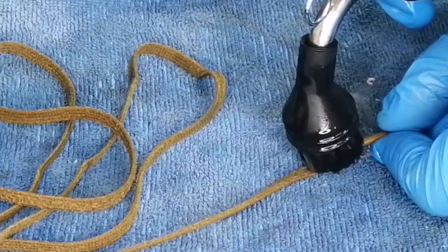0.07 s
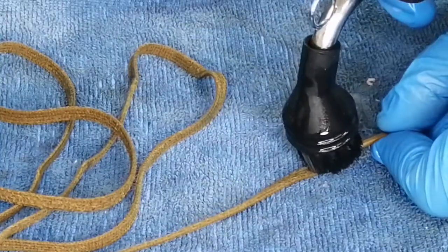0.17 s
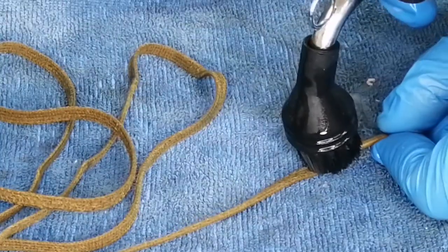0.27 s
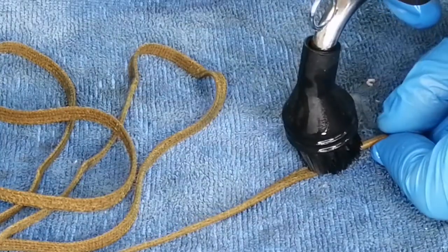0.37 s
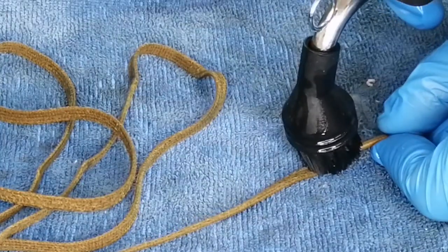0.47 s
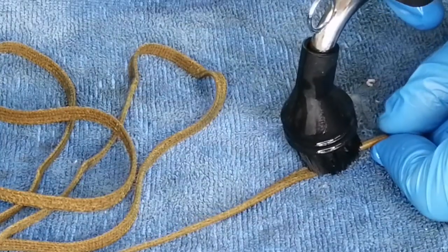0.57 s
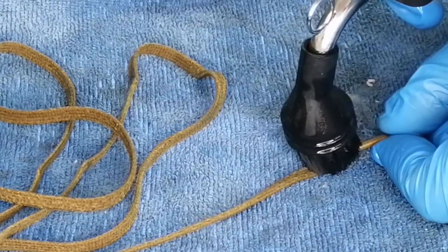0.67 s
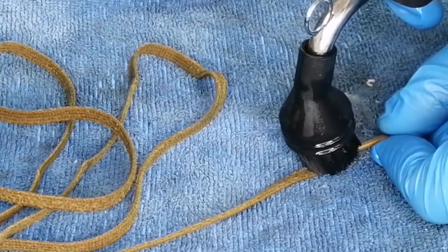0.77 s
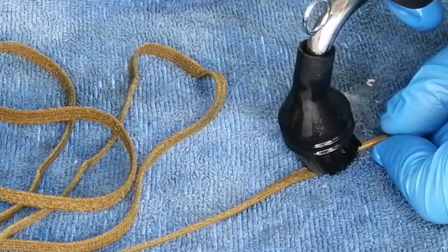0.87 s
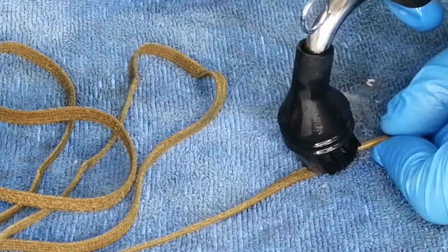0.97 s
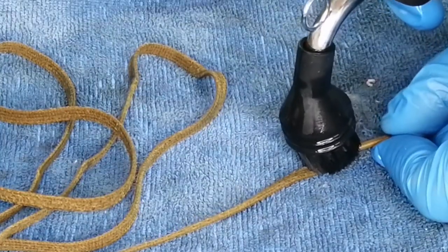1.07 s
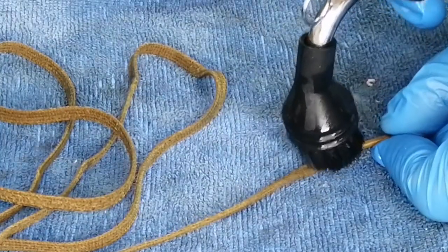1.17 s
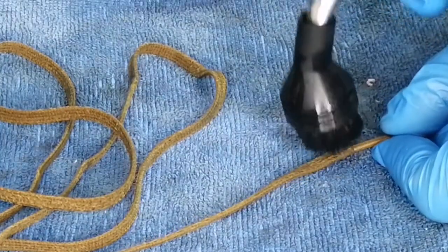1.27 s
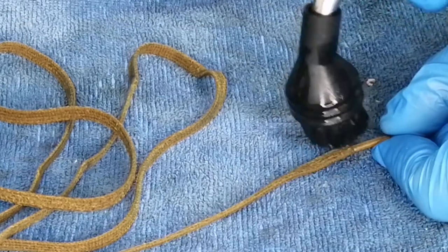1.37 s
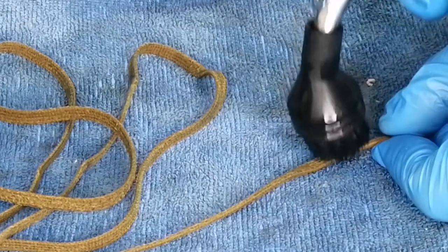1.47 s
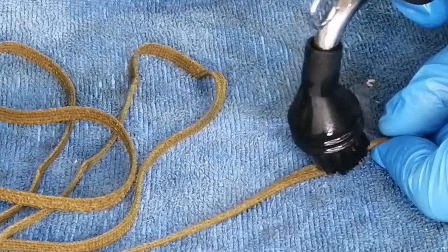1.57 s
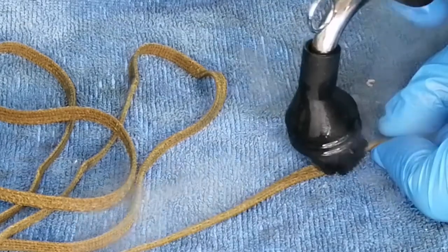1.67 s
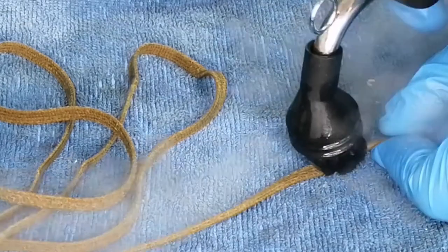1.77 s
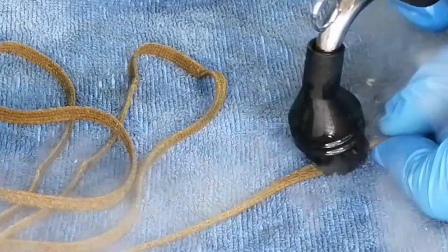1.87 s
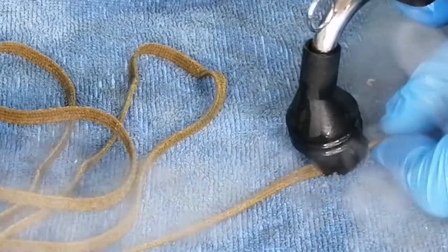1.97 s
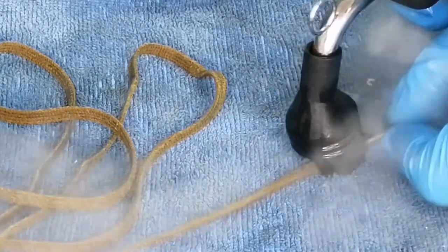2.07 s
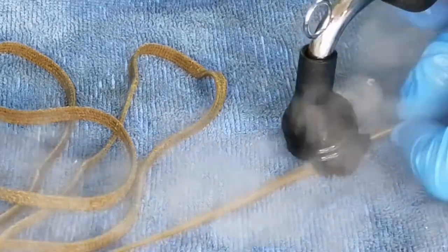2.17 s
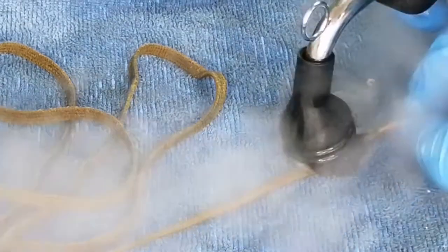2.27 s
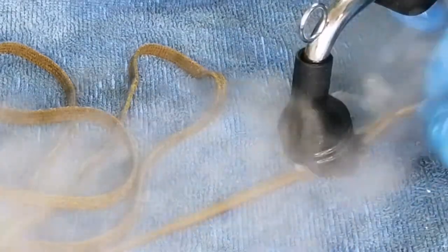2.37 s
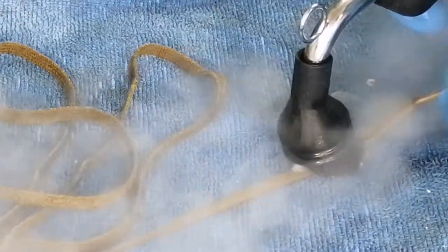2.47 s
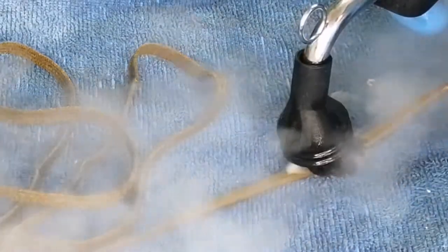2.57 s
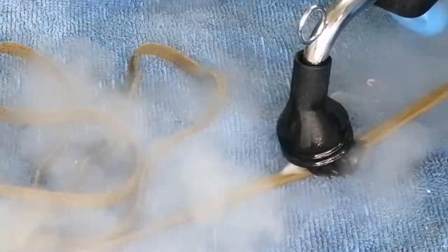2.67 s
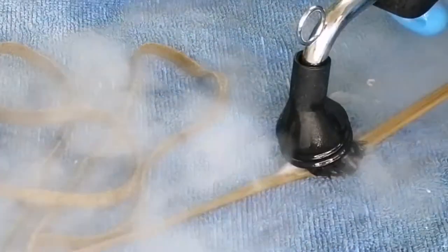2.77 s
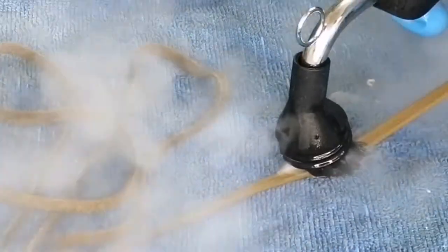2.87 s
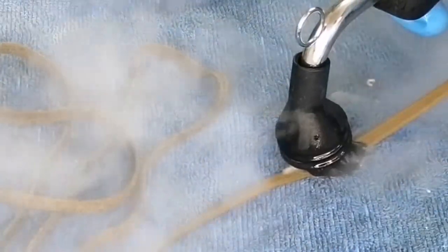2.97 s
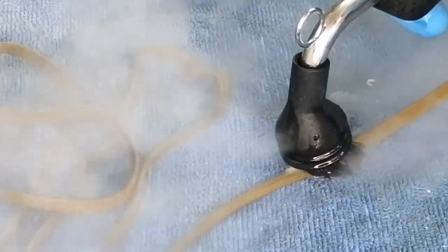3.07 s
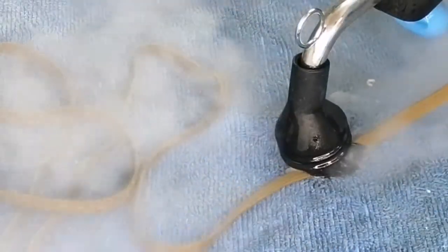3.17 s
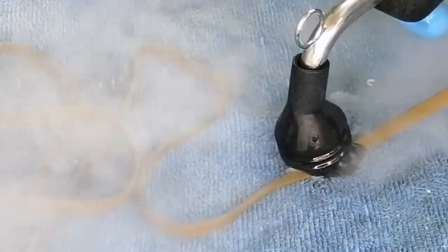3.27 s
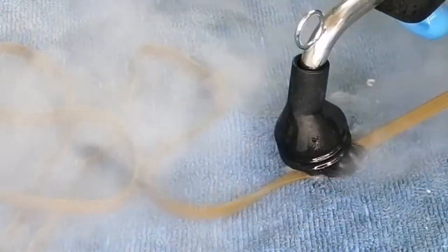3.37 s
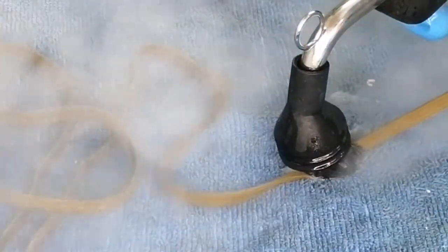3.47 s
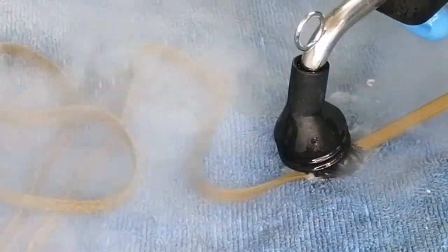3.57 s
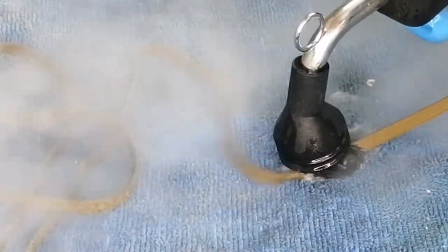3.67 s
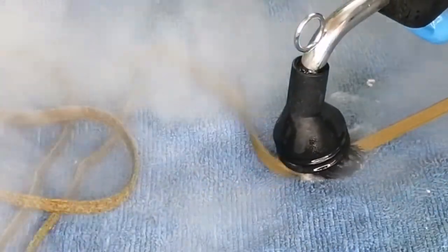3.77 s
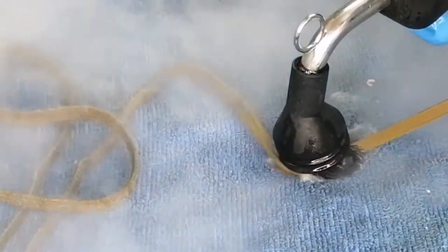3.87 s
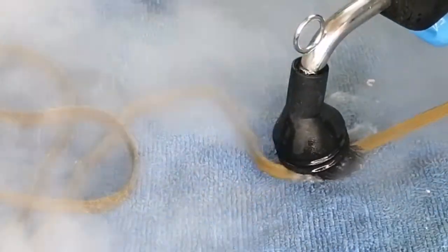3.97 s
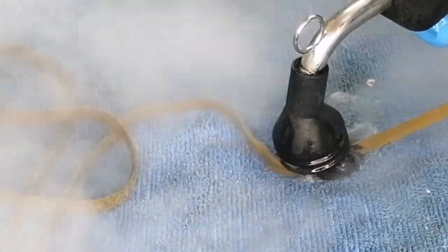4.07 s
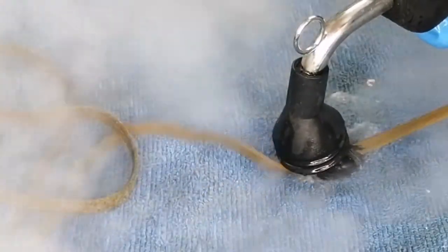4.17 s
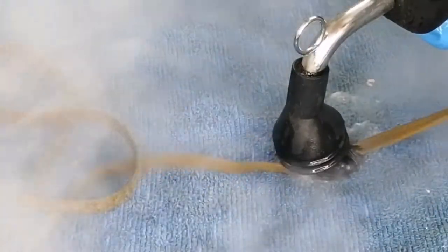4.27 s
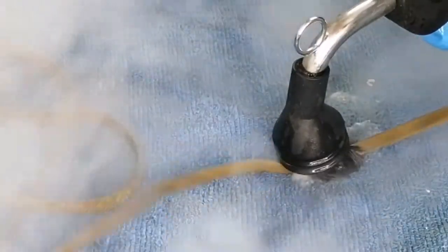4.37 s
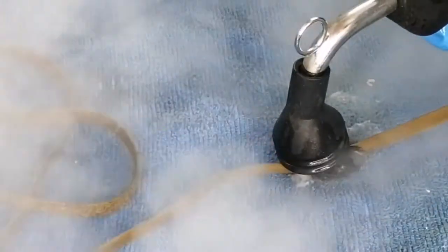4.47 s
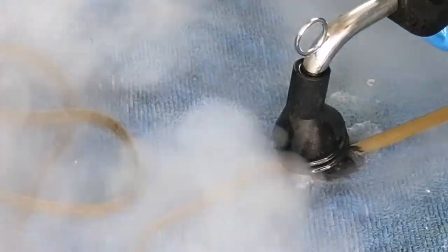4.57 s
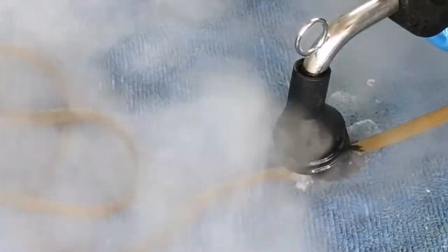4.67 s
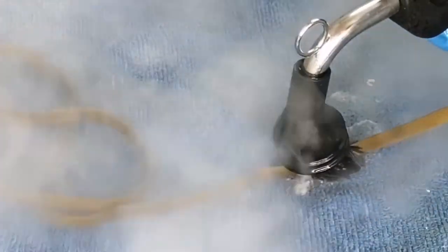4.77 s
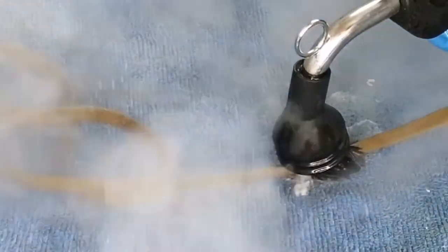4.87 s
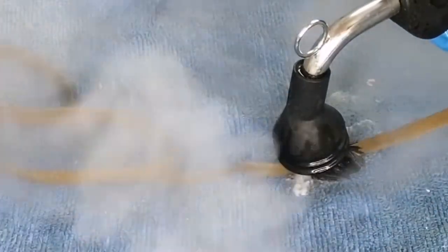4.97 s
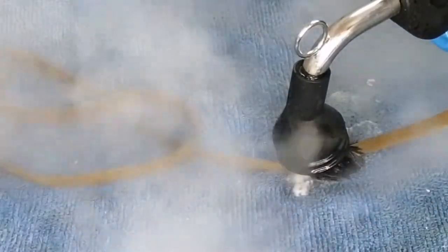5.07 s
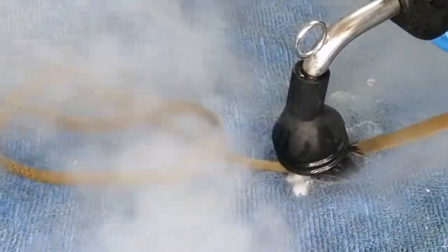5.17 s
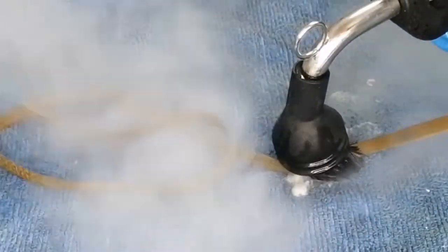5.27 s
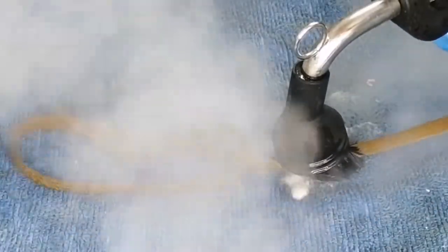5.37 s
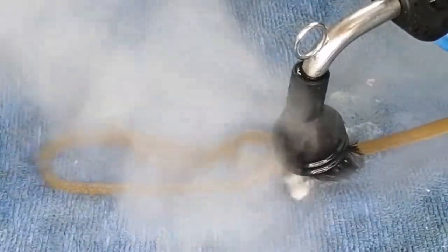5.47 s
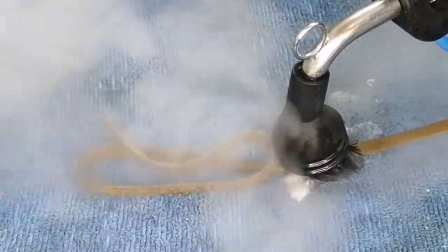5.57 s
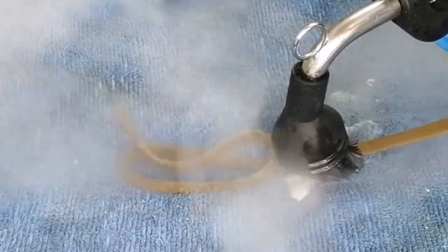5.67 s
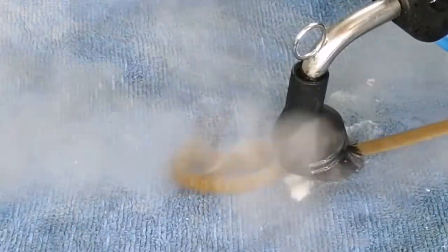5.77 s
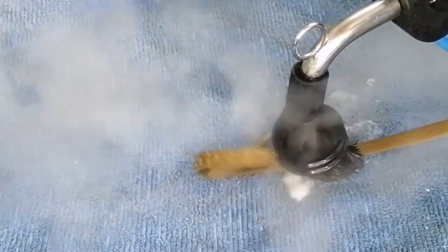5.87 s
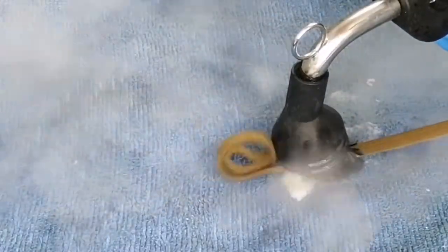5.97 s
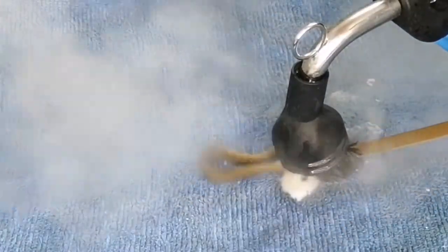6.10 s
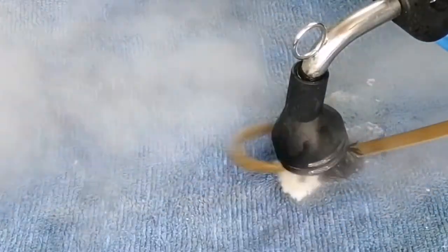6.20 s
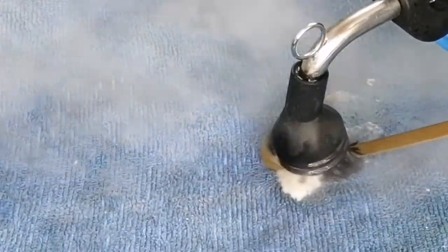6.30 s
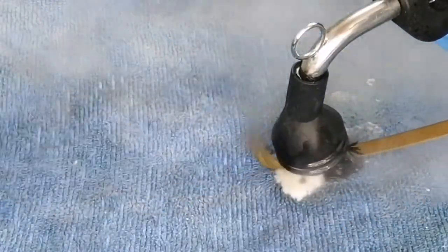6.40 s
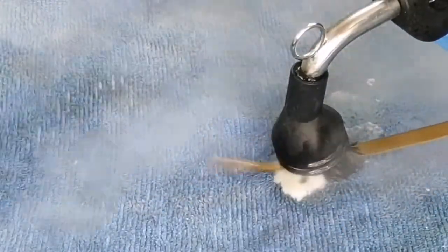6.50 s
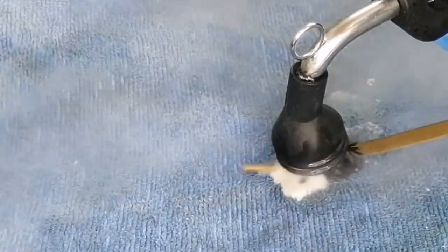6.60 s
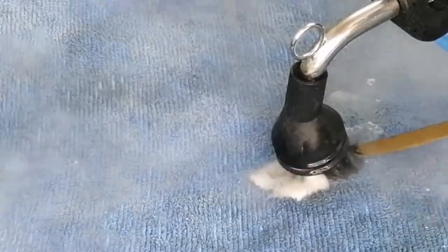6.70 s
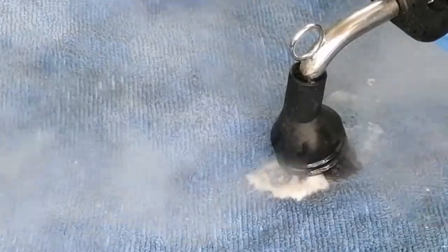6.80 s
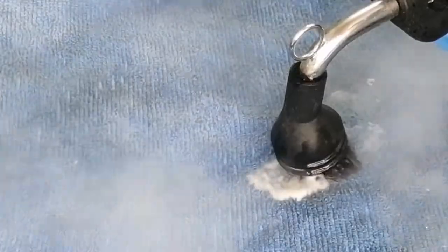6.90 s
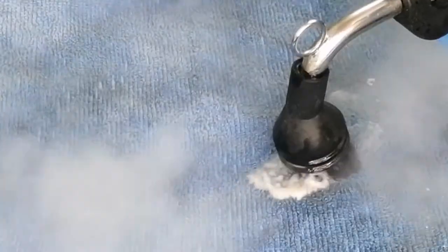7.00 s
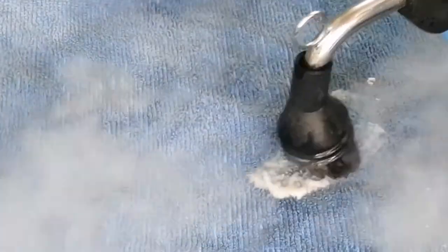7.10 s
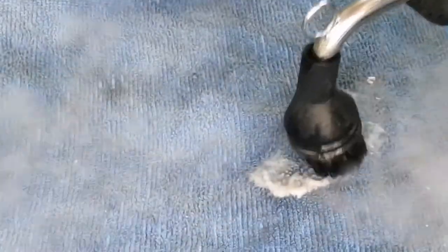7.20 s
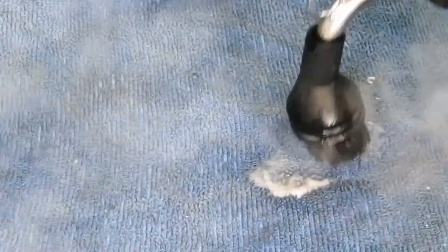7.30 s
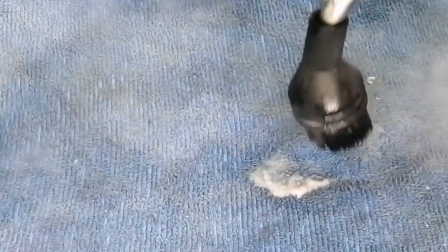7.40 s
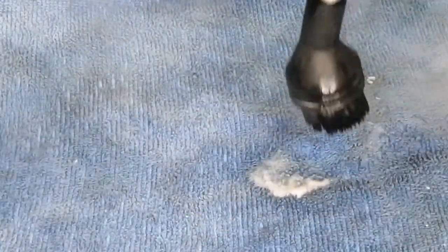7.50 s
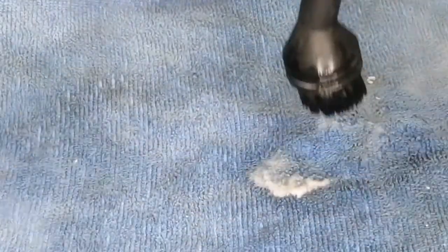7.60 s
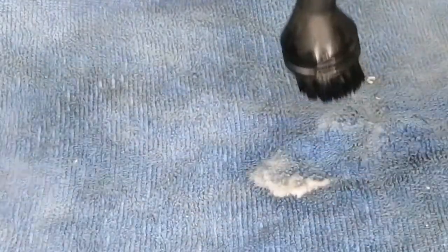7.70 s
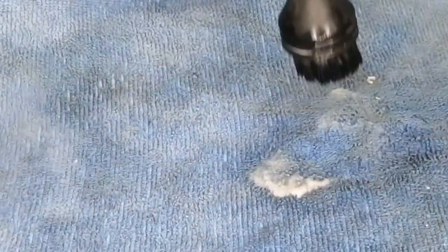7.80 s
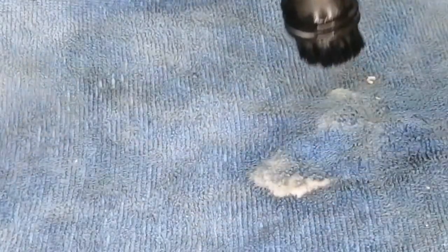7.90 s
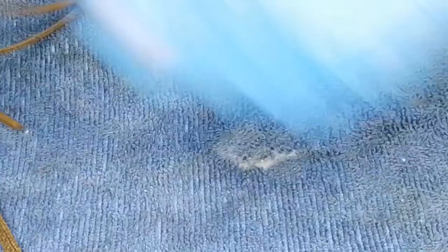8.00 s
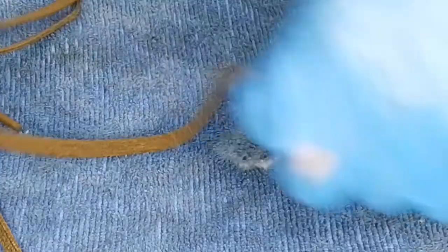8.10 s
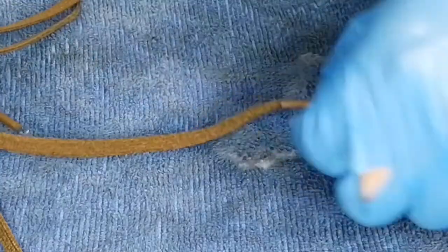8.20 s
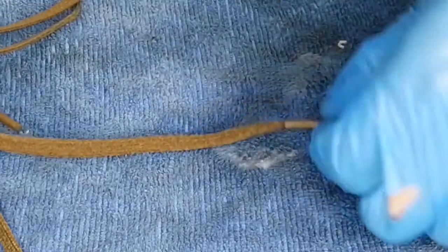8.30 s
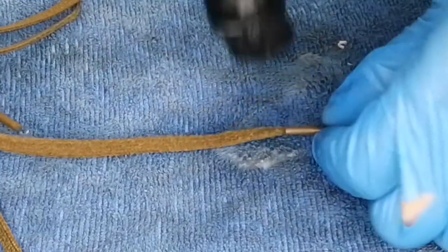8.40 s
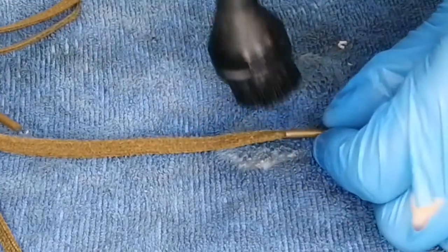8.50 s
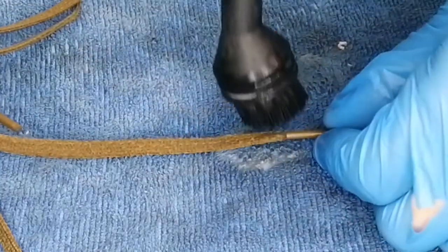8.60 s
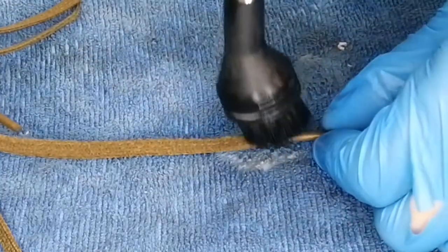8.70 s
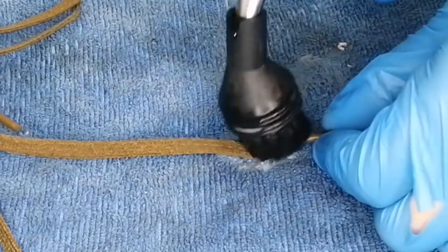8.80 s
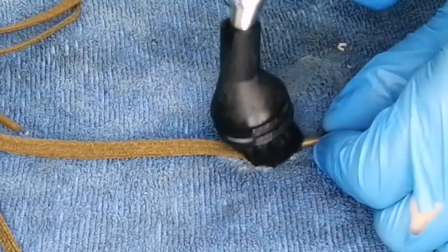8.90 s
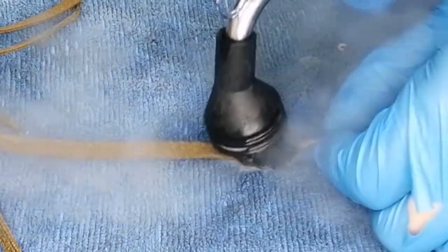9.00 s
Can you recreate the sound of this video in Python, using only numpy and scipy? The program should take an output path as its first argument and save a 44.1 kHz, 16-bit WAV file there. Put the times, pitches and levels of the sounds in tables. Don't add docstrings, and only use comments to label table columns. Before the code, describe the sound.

A steam cleaner clicks and spits two short jets, then hisses in one long wet burst, stops abruptly, and starts again after a quiet pause.

```python
import sys
import numpy as np
from scipy import signal
from scipy.fft import rfft, irfft, next_fast_len
from scipy.io import wavfile
from scipy.ndimage import uniform_filter1d

SR = 44100
rng = np.random.default_rng(int(sys.argv[2]) if len(sys.argv) > 2 else 0)


def wrap_up_sound(samples):
    columns = np.atleast_2d(samples).T
    tamed = np.clip(columns, -1, 1)
    steps = np.round(tamed * 32767).astype(np.int16)
    wavfile.write(sys.argv[1], SR, steps)


def decibels_to_gain(level_db):
    exponent = np.asarray(level_db, float) / 20
    return 10 ** exponent


N = 399105
TIME = np.arange(N) / SR
SIZE = next_fast_len(N + SR // 2, True)
FREQ = np.maximum(np.arange(SIZE // 2 + 1) * SR / SIZE, 1)
LEFT_RIGHT = np.array([[.5], [-.5]])


# start_s, water_db (condensed water in the jet), left_minus_right_db
HAND_MOVES = [(1.62, -5, 1), (1.72, -13, 3.5), (1.8, -9.5, 1), (1.95, -6.5, -2), (2.06, -6, -0.5),
              (2.13, -0.5, -3), (2.2, -6.5, 5), (2.23, 0.5, 3.5), (2.66, -3, 3.5), (2.76, -2, 3),
              (3.5, -7, 2), (4.1, -10, 1.5), (4.5, -10, 1), (7.04, -12, 2), (7.12, -7.5, 3.5),
              (8.91, 4.5, 7.5), (8.95, -8, 7.5), (9.02, -14.5, 6)]
# start_s, share (0-1)
BRUSH_PRESS = [
    (0, 0),
    (2.6, 0.32),
    (3.9, 0),
    (4.2, 0.8),
    (6.6, .95),
    (6.85, .55),
    (7.4, .55),
    (8.8, 0.47),
]


def jet():
    since, shut, lack, jet_db, warm = trigger()
    water_db, pan_db = on_time(HAND_MOVES, 0)
    push = np.interp(TIME, *np.transpose(BRUSH_PRESS))
    like, loose, pressed = lance()
    steam = turbulence(like, loose, pressed, push)
    hiss_db = jet_db + 0.43 * walk(30) + .6 * walk(5.06)
    out = hiss(steam, hiss_db, lack, water_db, warm, push, shut)
    out += gargles(steam)
    out += whistle(steam, hiss_db, warm, shut)
    flow_db = jet_db - 2.26 * lack - 249.5 * shut
    water = stereo(like, gain=droplets(2.6) * decibels_to_gain(1.2 * walk(60))) * loose
    wet = spitting(water, flow_db, water_db, since)
    wet += crackle(like, loose, flow_db, water_db)
    wet += cloth(water)
    wet *= 1 - 0.77 * np.exp(-since / 0.025)
    out = (out + wet) * (1 - np.exp(-since / 0.0037))
    out *= decibels_to_gain(LEFT_RIGHT * (pan_db - 3.0))
    return out * flowing() + leak(steam)


# start_s, shut_s, level_db, build_up_s, start_warmth (0-1)
BURSTS = [
    (1.619, 1.828, -31, 0.17, 0.15),
    (1.929, 2.077, -32, 0.053, .05),
    (2.14, 7.105, -34, 0.032, 0),
    (8.909, 16, -35.5, 0.023, 0.5),
]


def trigger():
    rows = np.array(BURSTS)
    latest = np.maximum(np.searchsorted(rows[:, 0], TIME) - 1, 0)
    on, off, level_db, build, cold = rows[latest].T
    since, late = np.abs(TIME - on), TIME - off
    surge_s, knee_s = .04, .03
    level_db = level_db + 2 * np.exp(-((late + surge_s) / surge_s) ** 2)
    level_db += 11 * np.exp(-since / 0.0065)
    level_db -= 1.5 * (1 - np.exp(-since / 1.04))
    warm = 1 - (1 - cold) * np.exp(-since / 0.61)
    shut = (late + np.hypot(late, knee_s)) / 2
    lack = np.clip(1 - since / build, 0, 1)
    return since, shut, lack, level_db, warm


def flowing():
    return sum((TIME >= on) & (TIME <= off + .3) for on, off, *_ in BURSTS) > 0


# pitch_hz, level_db (per Hz)
JET_COLOUR = [(60, -31), (200, -27.5), (370, -28), (520, -11), (800, -5.5), (1200, -3), (1800, 0),
              (3000, -4.5), (6000, -6.5), (9000, -3), (10500, -8.5), (12500, -19.5), (14000, -22.5),
              (15500, -23)]
# pitch_hz, width_hz, loose_db, pressed_db (above the jet)
LANCE_MODES = [(508, 42, 7.5, 5), (595, 22, 7, 1.5), (784, 200, 5, 2), (1237, 27, 7, 5),
               (1820, 310, 5, 4.5), (2410, 160, 6.5, 5.5), (2630, 42, -2, 8.5), (2783, 60, 4.5, 6),
               (3300, 120, 8, 5), (3550, 40, 9, 8), (4173, 159, 7.5, 9.5), (4720, 260, 5.5, 7.5),
               (5085, 91, 9.5, 6), (5600, 40, 8.5, 0.5), (5877, 110, 9, 9), (6150, 250, 4, 2.5),
               (6590, 230, 2, 6.5), (7240, 310, 5, 4), (7650, 480, 3.5, -1.5), (8620, 500, -6, 1)]
# pitch_hz, likeness (0-1)
PORT_LIKENESS = [(60, 0.2), (500, .95), (1400, 0.7), (3000, 0.5), (6800, 0.7), (10000, 0.3), (15000, 0.1)]
# pitch_hz, left_minus_right_db
PORT_LEAN = [(60, 2.5), (110, -13), (200, 2), (380, 3.5), (700, 0.5), (1290, 0.0), (2380, 2), (4400, 5),
             (8120, 5), (15000, -3)]
# pitch_hz, width_hz, depth_db
TABLE_NOTCHES = [(1140, 190, 4), (2030, 30, 6.5), (4250, 87, 6), (6470, 66, 9), (8230, 350, 5.5)]


def lance():
    colour = decibels_to_gain(on_freq(JET_COLOUR) + LEFT_RIGHT * on_freq(PORT_LEAN)) / humps(TABLE_NOTCHES)
    like = np.clip(on_freq(PORT_LIKENESS), 0, 1)
    hz, width, loose_db, pressed_db = np.transpose(LANCE_MODES)
    loose = colour * humps(zip(hz, width, loose_db)) * nearby(.05, -13.)
    pressed = colour * humps(zip(hz, width, pressed_db)) * nearby(.05, -13.)
    return like, loose, pressed


def turbulence(like, loose, pressed, push):
    share = np.clip(push + .22 * walk(4), 0, 1)
    drops = droplets(1.4)
    steam = stereo(like, lag=-1.3, gain=drops * np.sqrt(1 - share)) * loose
    return steam + stereo(like, lag=-0.74, gain=drops * np.sqrt(share)) * pressed


HISS_EDGES = [1450, 3000, 5400, 8200, 20000]
OPENING_LEVELS = [-8.5, -12, -9.5, -3.5]
# level_db (re jet), water_db (per dB), warm_db, pressed_db, fall_db_s (after shutting)
HISS_BANDS = [(-3, 0.38, -2, 3.5, 269), (-2, -0.17, -0.5, -1, 260), (-3.5, 0, 5.5, -7, 330),
              (-10, 0, 6.5, 0.5, 350.5)]


def hiss(steam, hiss_db, lack, water_db, warm, push, shut):
    out = 0
    for lo, hi, start_db, (db, wet, warm_db, push_db, fall) in zip(
            HISS_EDGES, HISS_EDGES[1:], OPENING_LEVELS, HISS_BANDS):
        level_db = hiss_db + db + start_db * lack + wet * water_db + warm_db * warm
        level_db = level_db + push_db * push - fall * shut + 0.55 * walk(60)
        out = out + part(steam, lo, hi) * decibels_to_gain(level_db)
    return out


# centre_s, half_width_s, level_db
SLUGS = [
    (2.257, 0.053, -36.5),
    (2.36, 0.043, -49.5),
    (1.755, 0.052, -44.5),
]


def gargles(steam):
    swell = sum(decibels_to_gain(db) * np.exp(-((TIME - s) / half) ** 2) for s, half, db in SLUGS)
    return part(steam, 2150, 2900) * swell


def whistle(steam, hiss_db, warm, shut):
    return part(steam, 3230, 3200) * decibels_to_gain(hiss_db - 11.5 - 11 * warm + 2.6 * walk(17) - 310 * shut)


def spitting(water, flow_db, water_db, since):
    spit = part(water, 460, 1300) * decibels_to_gain(flow_db - 3 + water_db + 0.48 * walk(10))
    spurt_db = 12 * np.exp(-since / .04)
    splash_db = -12 + 1.5 * water_db + spurt_db + 2.5 * walk(15)
    return spit + part(water, 170, 380) * decibels_to_gain(flow_db + splash_db)


def crackle(like, loose, flow_db, water_db):
    pops = (rng.random(N) < 35 / SR) * decibels_to_gain(2.9 * rng.exponential(size=N))
    return part(stereo(like, gain=pops) * loose, 600, 7000) * decibels_to_gain(flow_db - 15.5 + 0.45 * water_db)


# start_s, end_s, level_db
CLOTH_FLAPS = [
    (1.62, 1.694, -55),
    (1.94, 2.14, -65),
    (2.16, 2.688, -54),
    (2.7, 3.352, -65.5),
    (8.91, 8.954, -45),
]


def cloth(water):
    flaps = sum(decibels_to_gain(db) * ((TIME > start) & (TIME < end)) for start, end, db in CLOTH_FLAPS)
    boom = water[0] / (1 + ((FREQ - 126) / 6) ** 2)
    return part(boom, 90, 170) * uniform_filter1d(flaps, SR // 30)


# start_s, level_db
WISP = [
    (0, -83),
    (.1, -82),
    (.45, -87),
    (.6, -105),
]


def leak(steam):
    return part(steam, 3000, 5400) * decibels_to_gain(on_time(WISP, -99)[0])


# start_s, click_db (peak), ring_db
VALVE_SNAPS = [
    (1.6242, -10, -24.5),
    (1.803, -46.5, -39),
    (1.9335, -16.5, -28),
    (2.062, -48, -37),
    (2.146, -25, -27),
    (7.075, -39.5, -45),
    (8.9098, -16.5, -25.5),
]
# pitch_hz, level_db, t60_s
GRIP_MODES = [(530.5, 0, 0.3), (566, -13, .2), (220, -15.5, 0.17), (1114, -15.5, 0.1), (3311, 1, .08)]


def valve():
    out, t = np.zeros((2, N + SR)), np.arange(SR // 2) / SR
    click = np.sin(2 * np.pi * 2600 * t + .8) * np.exp(-t / .0003)
    swell = (1 - np.exp(-(t / 0.0084) ** 2)) * np.exp(-(t / 0.055) ** 2)
    for s, click_db, ring_db in VALVE_SNAPS:
        ring = np.zeros(len(t))
        for hz, db, t60 in GRIP_MODES:
            ring += decibels_to_gain(db) * np.sin(2 * np.pi * (hz * t + rng.random())) * decibels_to_gain(-60 * t / t60)
        snap = decibels_to_gain(click_db + 1.5) * click + decibels_to_gain(ring_db + 3.5) * ring * swell
        k = int(s * SR)
        out[:, k:k + len(t)] += snap * decibels_to_gain([[2.2], [-2.2]])
    return out[:, :N]


# start_s, pitch_hz, level_db, t60_s
BODY_TONES = [
    (2.05, 232, -49.5, .3),
    (7.076, 234, -48.5, 0.24),
    (7.1, 432, -61.5, 2.2),
]


def shutting():
    out = np.zeros(N)
    for s, hz, db, t60 in BODY_TONES:
        t = TIME - s
        out += decibels_to_gain(db - 60 * np.abs(t) / t60) * np.sin(2 * np.pi * hz * t) * (t > 0)
    return out


# start_s, level_db (peak)
TRIGGER_TICKS = [
    (1.614, -49.5),
    (7.969, -69.5),
    (8.9003, -46.5),
    (8.906, -47.5),
]


def ticks():
    out, t = np.zeros((2, N)), np.arange(SR // 100) / SR
    for s, peak_db in TRIGGER_TICKS:
        noise = rng.standard_normal((2, len(t)))
        k = int(s * SR)
        out[:, k:k + len(t)] += decibels_to_gain(peak_db) * np.diff(noise, prepend=0) * np.exp(-t / 0.0019)
    return out


def room(x, t60, wet_db):
    t = np.arange(SR // 2) / SR
    echoes = rng.standard_normal((2, len(t))) * decibels_to_gain(-60 * t / t60) * (t > .004)
    echoes /= np.sqrt(np.sum(echoes ** 2, axis=1, keepdims=True))
    colour = decibels_to_gain(wet_db) / np.sqrt((1 + (FREQ / 6000) ** 2) * (1 + (1500 / FREQ) ** 4))
    return irfft(rfft(x.mean(axis=0), SIZE) * rfft(echoes, SIZE) * colour, SIZE)[..., :N]


# pitch_hz, level_db (per Hz)
HUM_COLOUR = [(12, -51), (20, -19.5), (76, -11), (135, -4), (199, -8), (256, -15), (286, -8.5), (409, -14),
              (457, -17), (693, -21.5), (1050, -26), (1140, -26.5), (1270, -28.5), (1510, -25),
              (15000, -57.5)]
# pitch_hz, width_hz, level_db (above the rumble)
ROOM_MODES = [(56, 8, 5.5), (127.7, 73, 5), (141, 58, -1.5), (225, 25, 2.5), (298, 28, 0), (421, 16, 8),
              (700, 60, 6), (880, 15, 2), (1110, 23, 7.5), (9300, 900, 1)]
# pitch_hz, level_db (rms)
MAINS_HUM = [(100, -72.5), (199.5, -66.5), (424, -83)]
# centre_s, half_width_s, level_db
RUMBLE_SWELLS = [
    (1.17, 0.056, 4.5),
    (7.52, .15, 3),
]


def background():
    like = .95 / (1 + (FREQ / 1500) ** 2) / (1 + (25 / FREQ) ** 2)
    noise = stereo(like, lag=-6.0) * decibels_to_gain(on_freq(HUM_COLOUR)) * humps(ROOM_MODES)
    whole = irfft(noise, SIZE)[:, :N]
    bass = irfft(noise * band(74, 250), SIZE)[:, :N]
    hum = sum(decibels_to_gain(db + 3 + 1.2 * walk(3)) * np.sin(2 * np.pi * hz * TIME) for hz, db in MAINS_HUM)
    swell_db = sum(db * np.exp(-((TIME - s) / half) ** 2) for s, half, db in RUMBLE_SWELLS) - 1.5
    rumble = (bass * decibels_to_gain(swell_db) + whole - bass) * decibels_to_gain(-59.0) / np.std(bass)
    return (rumble + hum) * decibels_to_gain([[.7], [-.7]])


def stereo(like, lag=0., gain=1.):
    mid, side = rfft(rng.standard_normal((2, N)) * gain, SIZE)
    turn = np.exp(1j * np.pi * FREQ * lag / SR)
    mid, side = mid * np.sqrt(1 + like), side * np.sqrt(1 - like)
    return np.array([(mid + side) / turn, (mid - side) * turn])


def nearby(t60, share_db):
    t = np.arange(SR // 20) / SR
    echoes = rng.standard_normal((2, len(t))) * decibels_to_gain(-60 * t / t60)
    echoes *= decibels_to_gain(share_db) / np.sqrt(np.sum(echoes ** 2, axis=1, keepdims=True))
    return 1 + rfft(echoes, SIZE)


def droplets(spread_db):
    return decibels_to_gain(spread_db * rng.exponential(size=N))


def walk(rate):
    k = int(SR / rate)
    held = np.repeat(rng.standard_normal(N // k + 1), k)
    return 0.97 * uniform_filter1d(uniform_filter1d(held, k), k)[:N]


def humps(peaks):
    return decibels_to_gain(sum(db * width ** 2 / (width ** 2 + 4 * (FREQ - hz) ** 2) for hz, width, db in peaks))


def band(lo_hz, hi_hz):
    return 1 / np.sqrt((1 + (lo_hz / FREQ) ** 12) * (1 + (FREQ / hi_hz) ** 12))


def part(spectrum, lo_hz, hi_hz):
    x = irfft(spectrum * band(lo_hz, hi_hz), SIZE)[..., :N]
    return x / np.sqrt(np.mean(np.mean(np.atleast_2d(x), axis=0) ** 2))


def on_freq(table):
    hz, value = np.transpose(table)
    return np.interp(np.log(FREQ), np.log(hz), value)


def on_time(table, rest_db):
    s, *columns = np.transpose(table)
    return [np.interp(TIME, s, c, left=rest_db) for c in columns]


def scene():
    near = jet() + valve() + shutting() + ticks()
    loud = sum((TIME > on) & (TIME < off + .09) for on, off, *_ in BURSTS) > 0
    duck_db = -6. * uniform_filter1d(1. * loud, SR // 10)
    return near + room(near, t60=.42, wet_db=-11.) + background() * decibels_to_gain(duck_db)


def roll_off(x):
    return signal.sosfilt(signal.butter(12, 15170, fs=SR, output="sos"), x)


def record(dry):
    return roll_off(dry)


dry = scene()
out = record(dry)
wrap_up_sound(out)
```